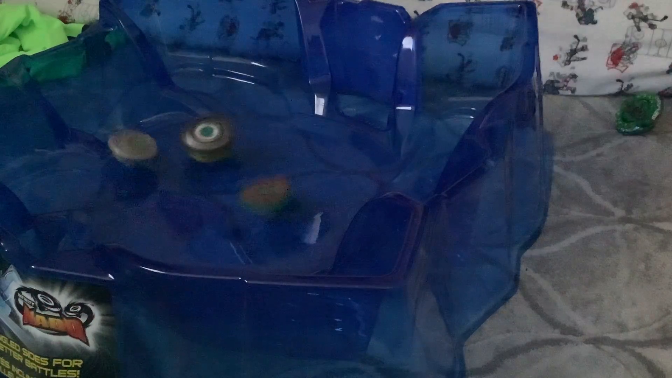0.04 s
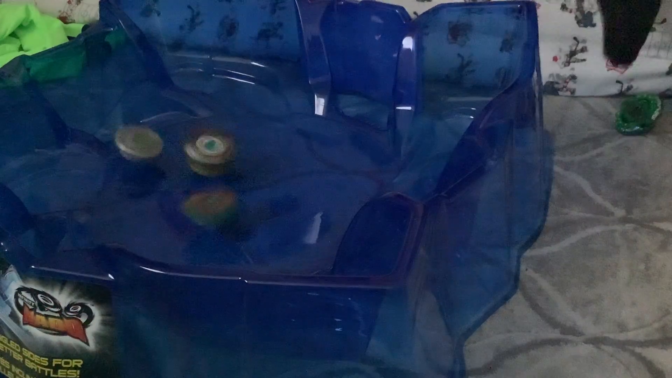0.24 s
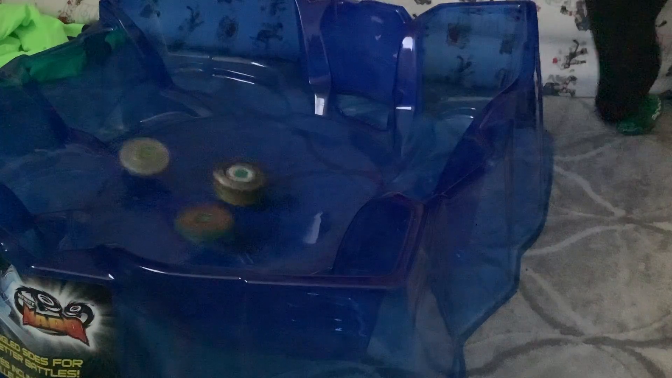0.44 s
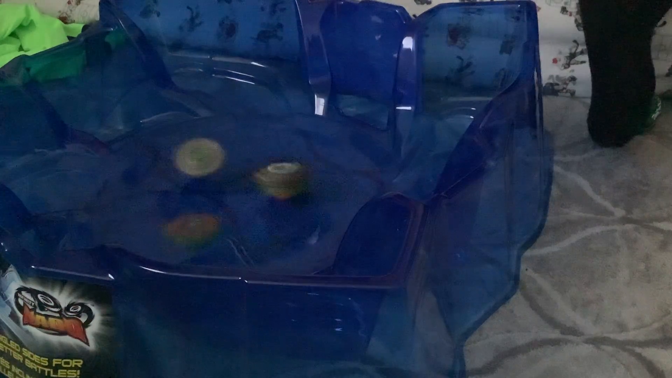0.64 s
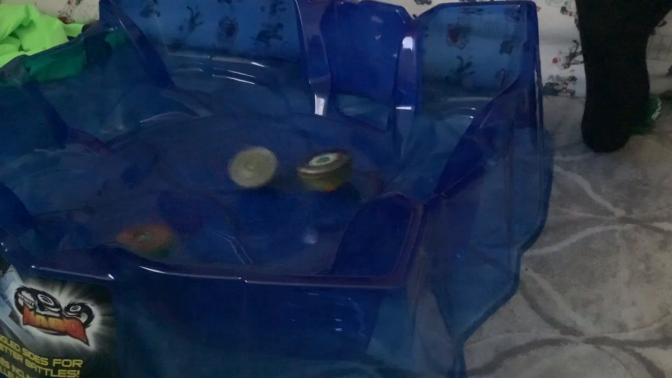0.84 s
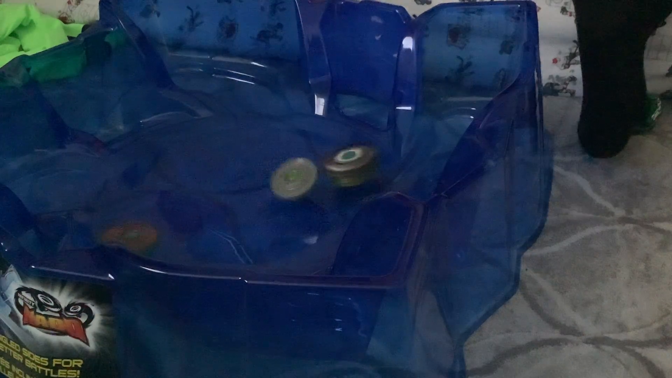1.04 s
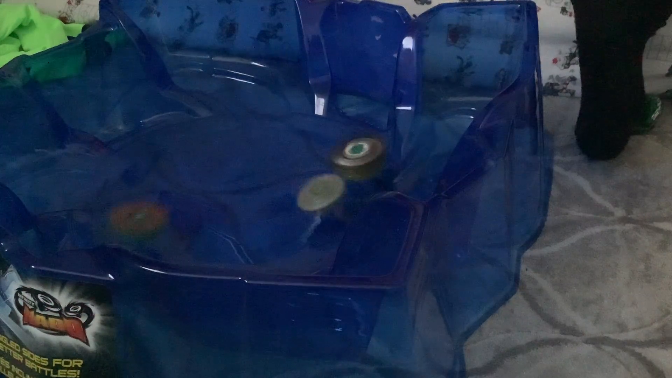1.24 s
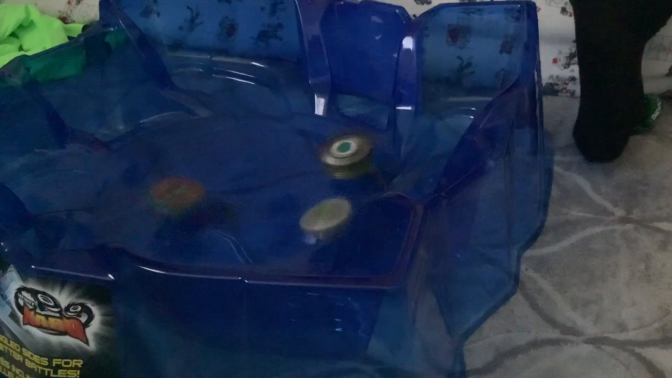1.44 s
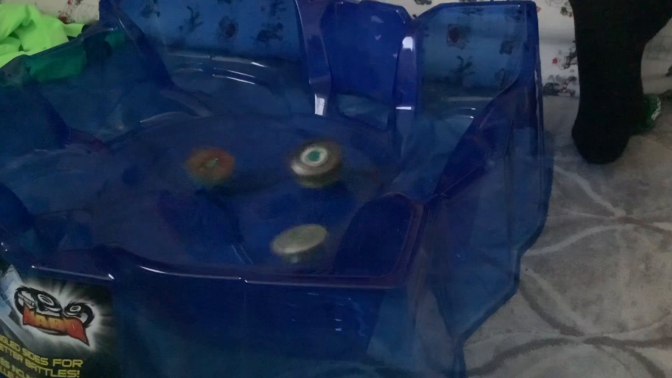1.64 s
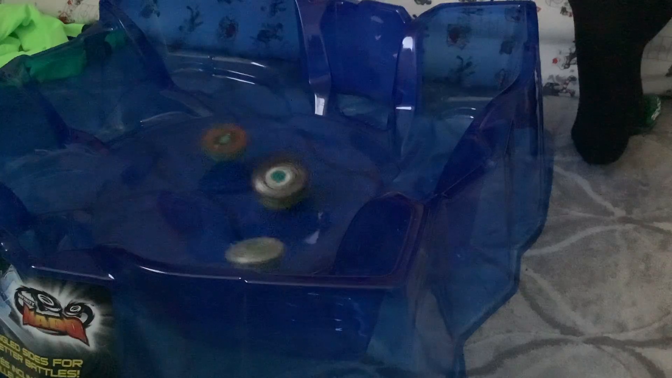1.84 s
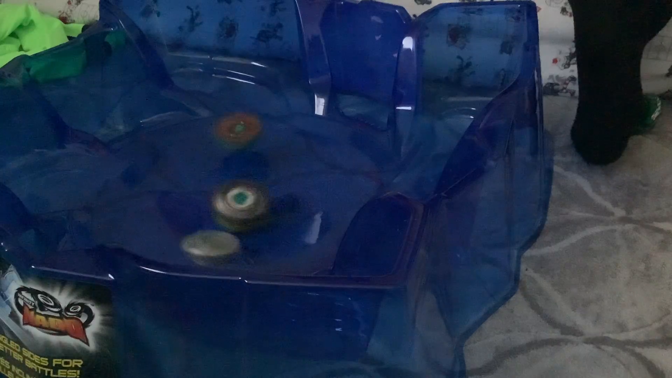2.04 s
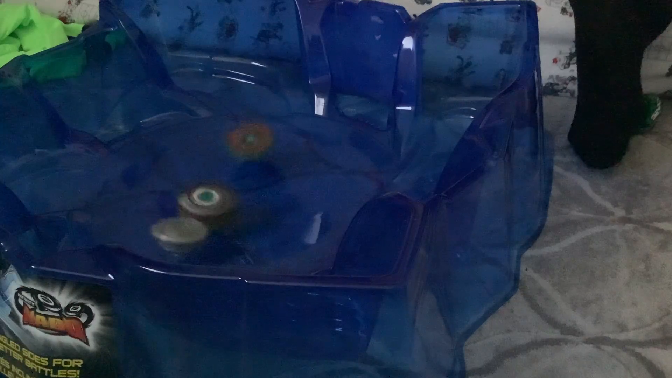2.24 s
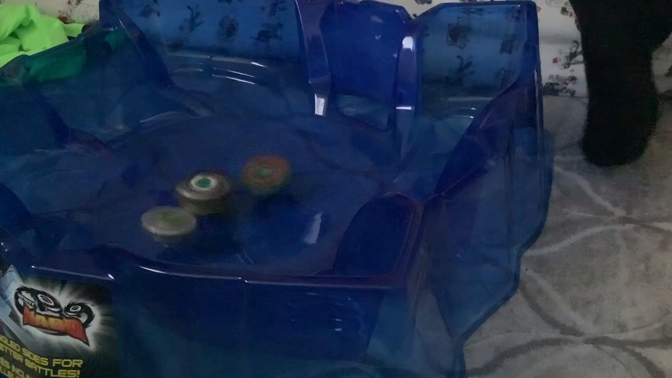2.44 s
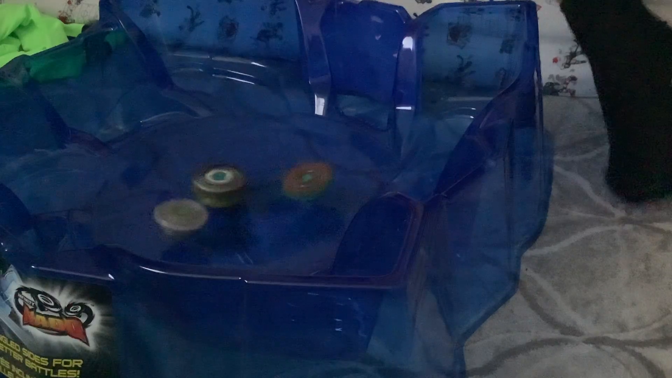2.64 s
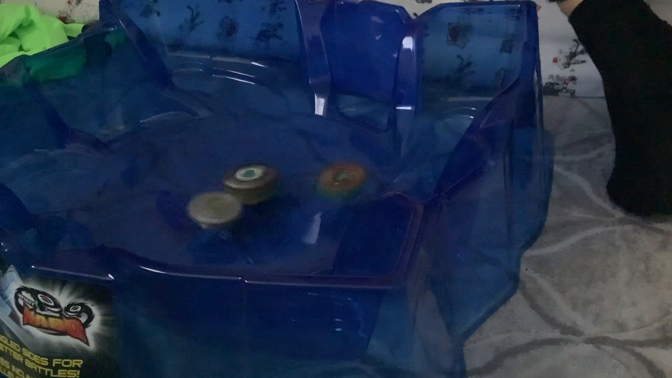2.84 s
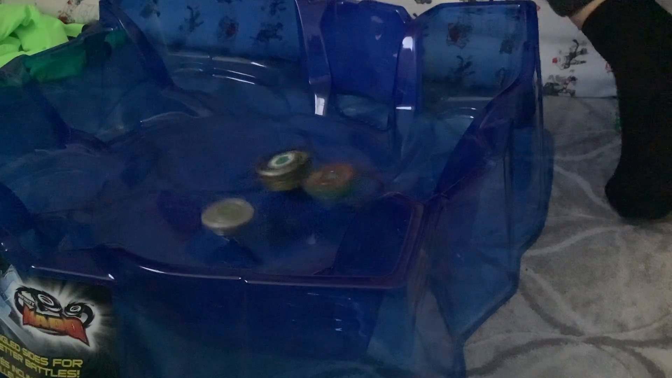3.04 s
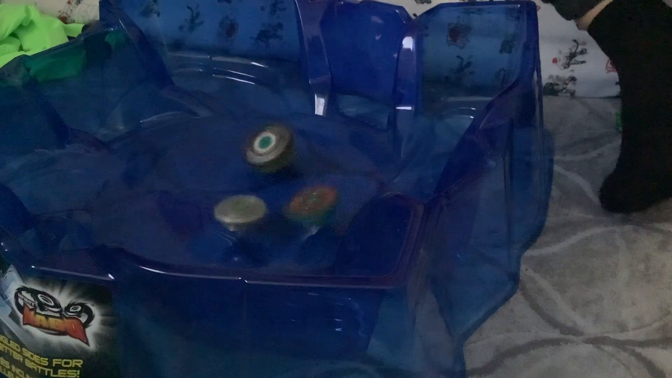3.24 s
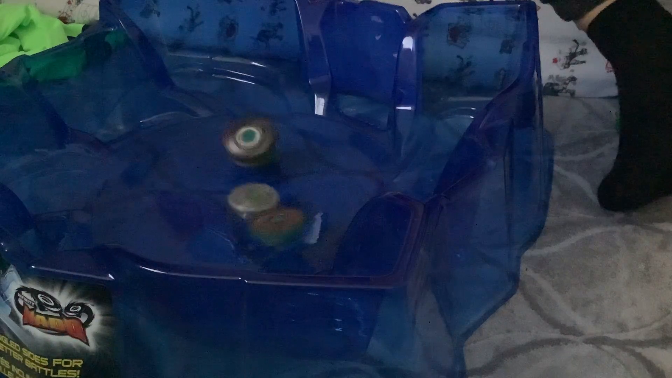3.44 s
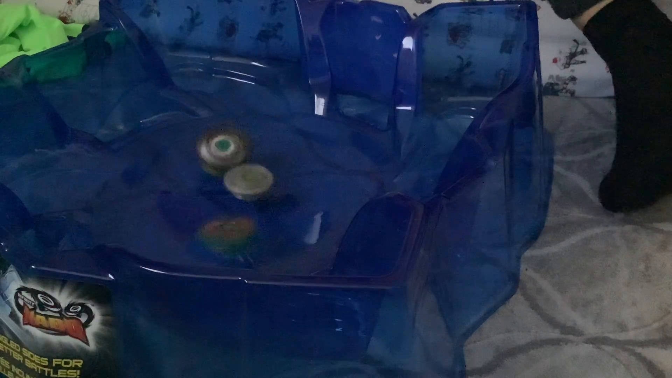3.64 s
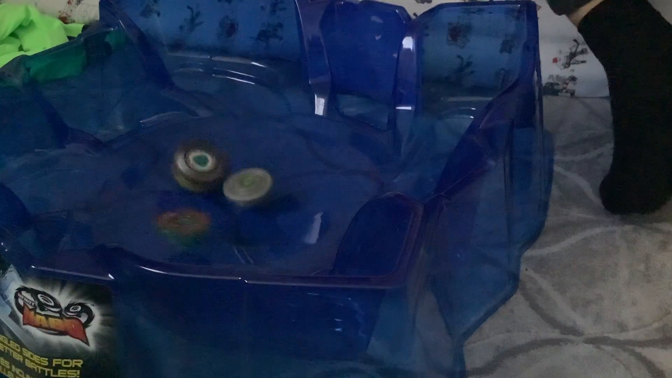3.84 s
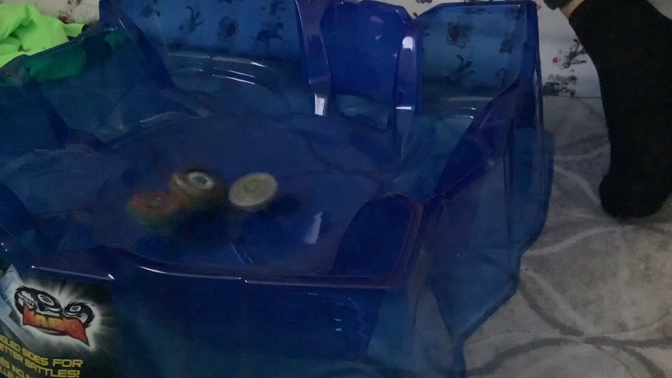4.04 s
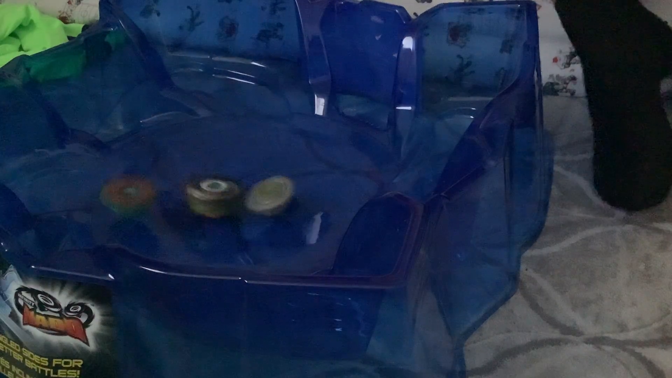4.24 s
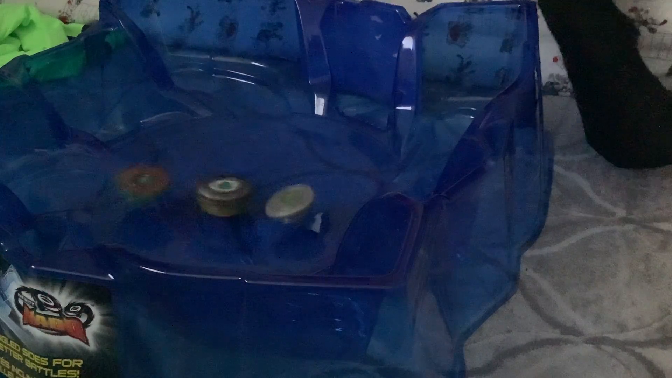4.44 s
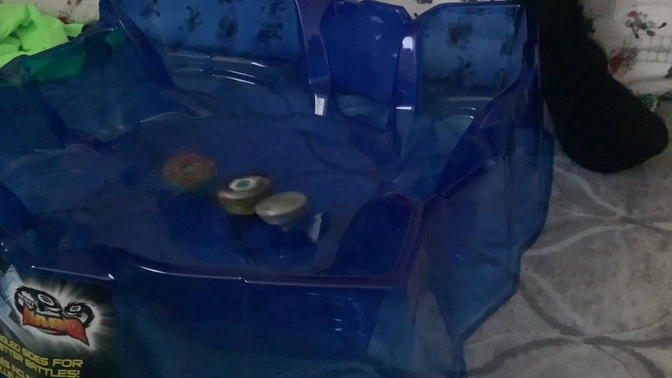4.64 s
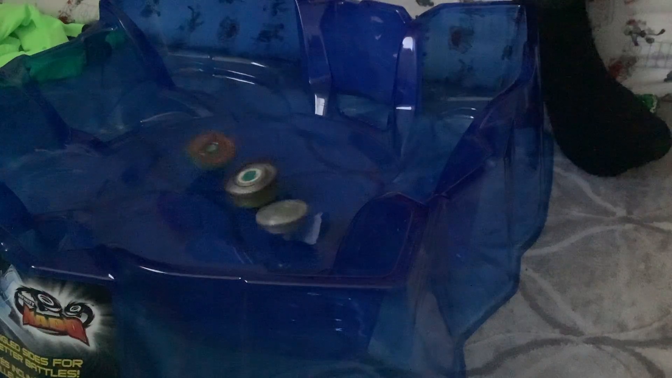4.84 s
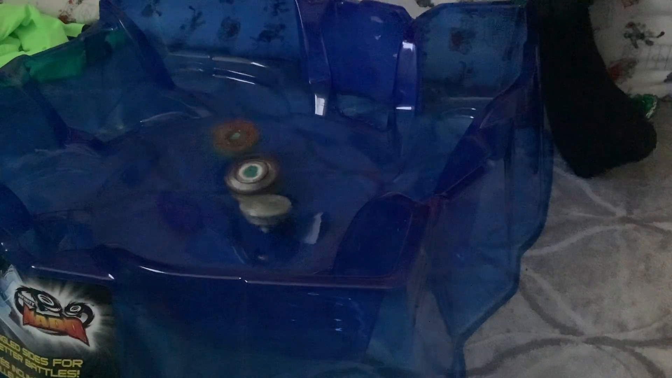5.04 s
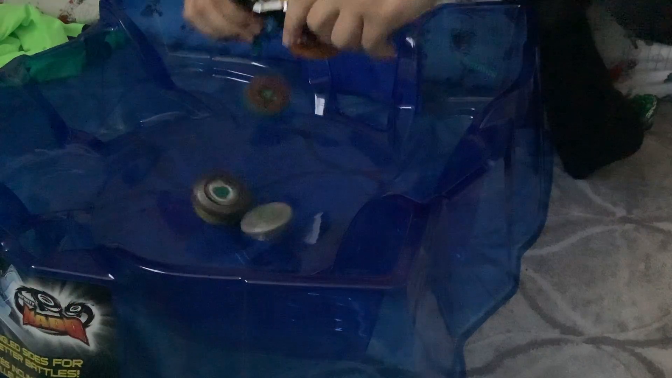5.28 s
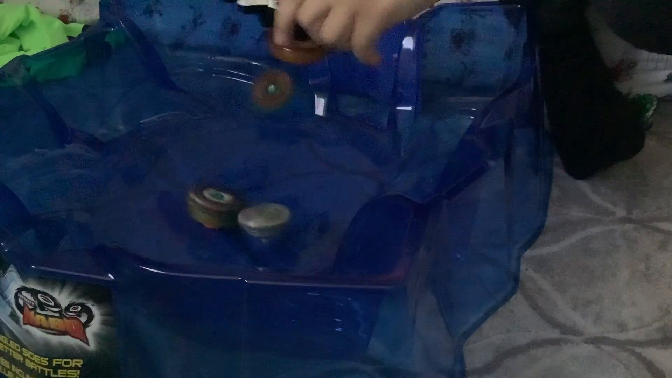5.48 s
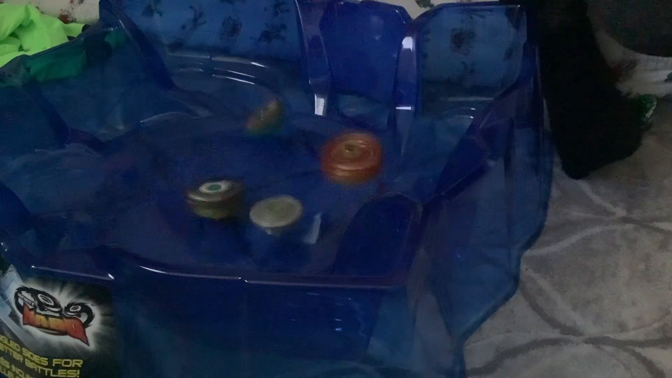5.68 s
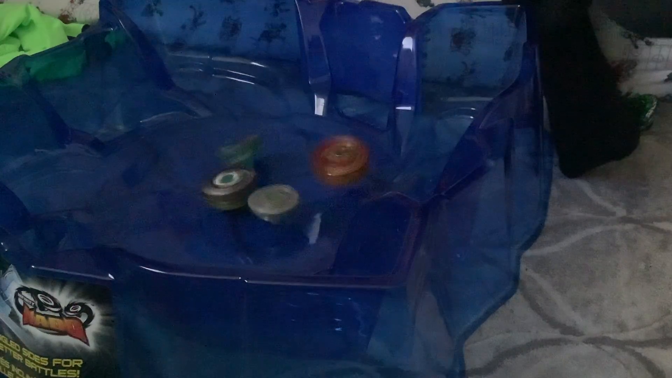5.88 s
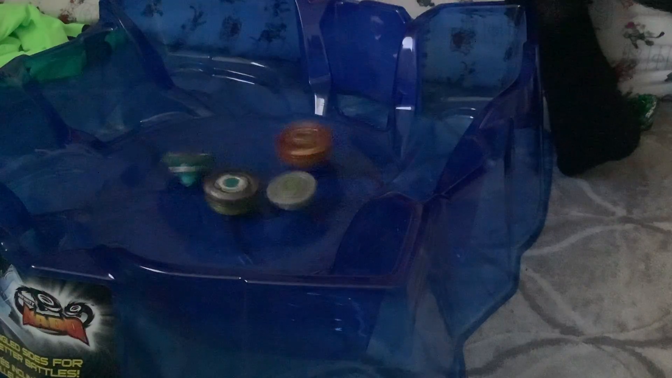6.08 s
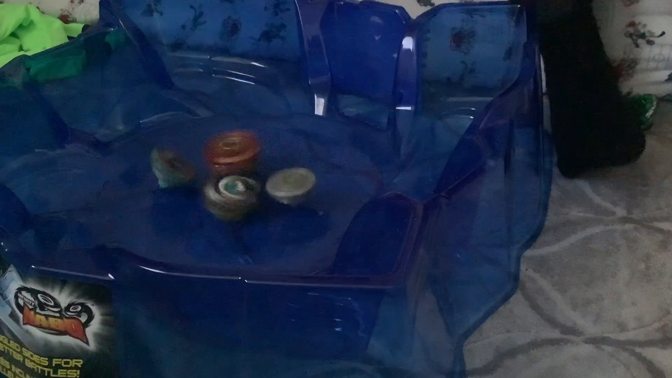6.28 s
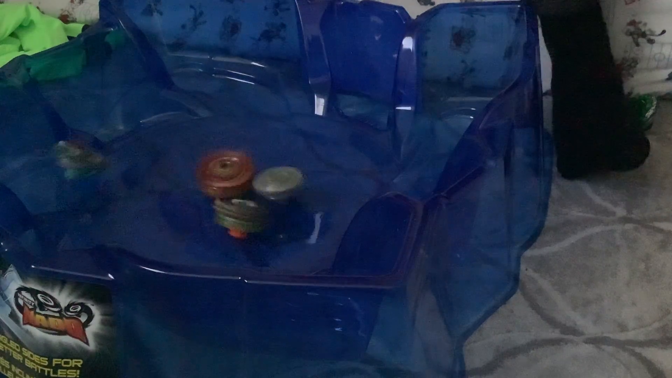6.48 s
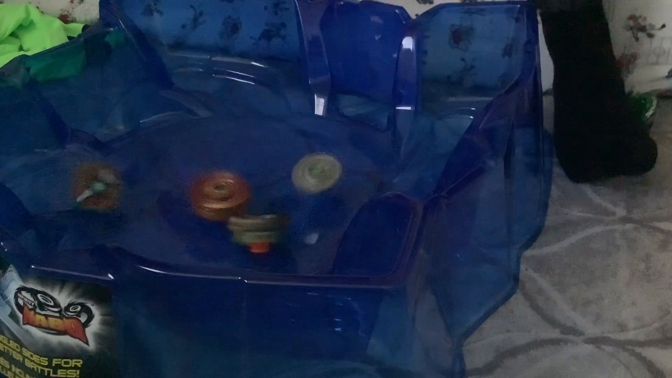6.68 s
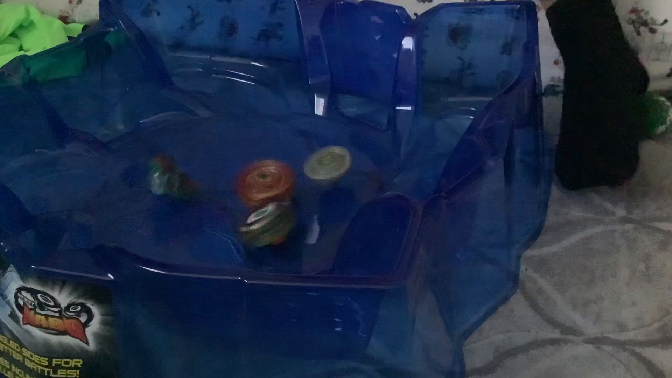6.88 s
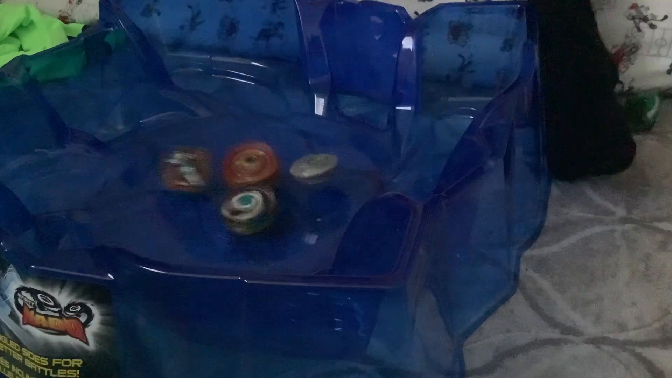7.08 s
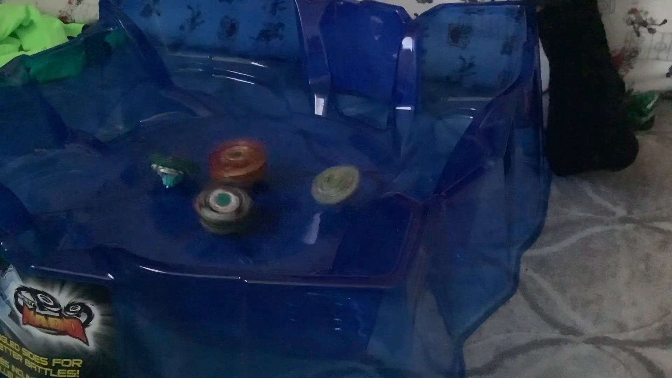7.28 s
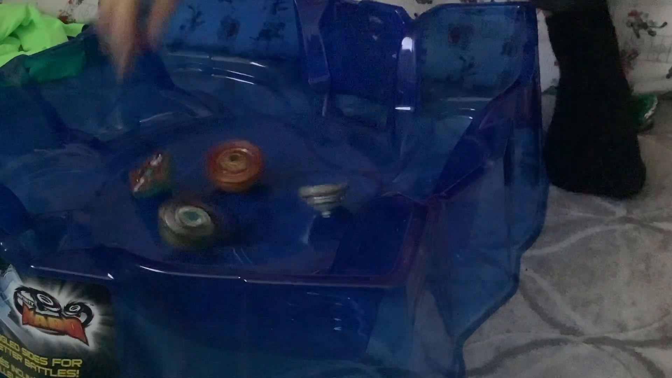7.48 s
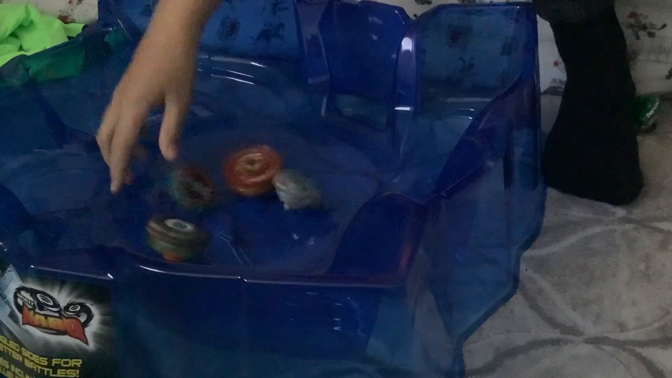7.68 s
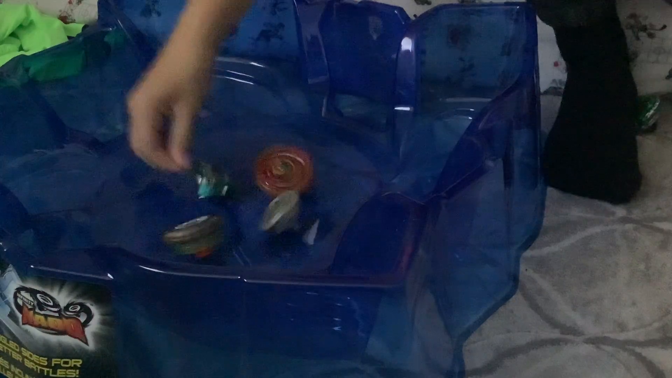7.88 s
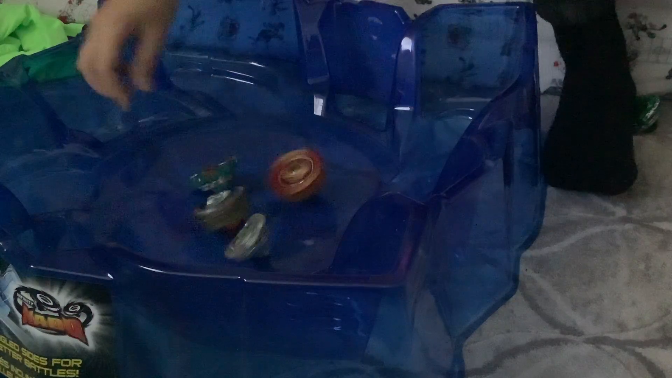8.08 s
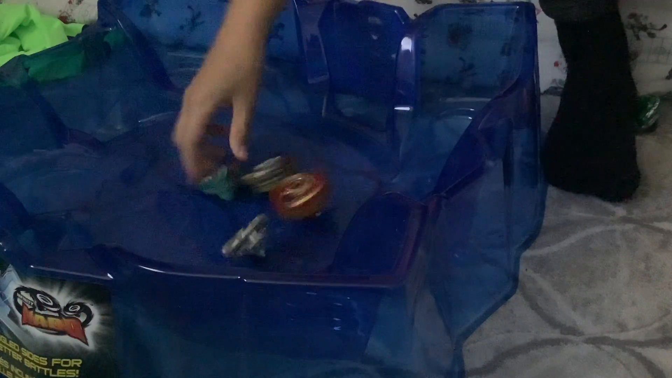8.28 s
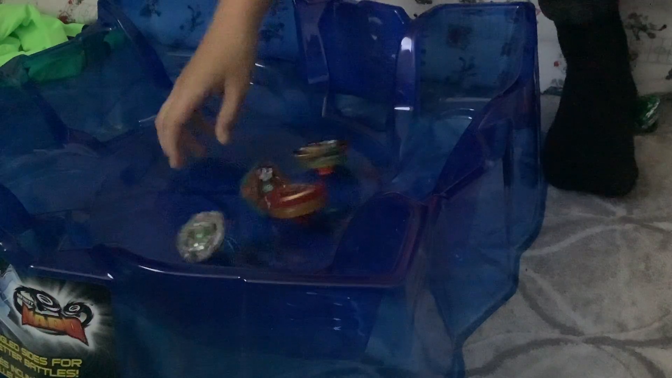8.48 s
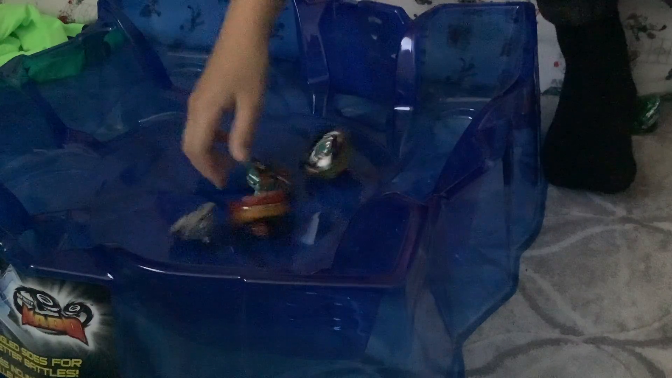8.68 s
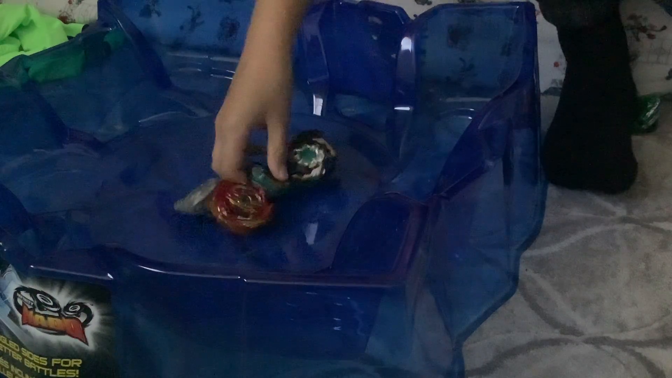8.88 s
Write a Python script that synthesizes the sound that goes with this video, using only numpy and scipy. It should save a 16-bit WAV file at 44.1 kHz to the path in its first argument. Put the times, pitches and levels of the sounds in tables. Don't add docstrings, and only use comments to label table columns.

```python
import sys
import numpy as np
from scipy import signal
from scipy.fft import rfft, irfft, next_fast_len
from scipy.io import wavfile

SR = 44100
rng = np.random.default_rng(int(sys.argv[2]) if len(sys.argv) > 2 else 0)


def ratio_of_db(decibels):
    return 10 ** (np.asarray(decibels, float) / 20)


def wrap_up_sound(samples):
    columns = np.atleast_2d(samples).T
    tamed = np.clip(columns, -1, 1)
    steps = np.round(tamed * 32767).astype(np.int16)
    wavfile.write(sys.argv[1], SR, steps)


N = 393372

# (frequency [Hz], level [dB], decay t60 [s])
RING_MODES = [(6720, -16, .4), (7773, -7, .2), (7815, -8, .24), (12570, -2, .17), (14660, 0, .17)]
# (frequency [Hz], level [dB], decay t60 [s])
BOWL_MODES = [(236, -4.5, 0.12), (282.7, 0, 0.11), (326, -9.5, 0.11), (393.4, 2, 0.099), (457.5, -2, 0.087),
              (493, 1, 0.036), (549.4, -1.5, 0.034), (589.6, -2.5, 0.039)]
# (frequency [Hz], level [dB], decay t60 [s])
FLEX_MODES = [(79.2, -0.5, 0.12), (94.9, 5.5, 0.12), (117, 9, 0.032), (153.9, -6.5, 0.23),
              (192, -9.5, 0.18)]
# (frequency [Hz], level [dB], decay t60 [s])
SHELL_MODES = [(1541, -0.5, 0.017), (1927, 3, 0.005), (2064, -4, 0.043), (2306, 9.5, 0.004),
               (2737, 2, 0.015), (2910, -2, 0.031), (3020, 3, 0.0078), (3275, -10, 0.022),
               (3520, 3, 0.0043)]
# (frequency [Hz], level [dB], decay t60 [s])
KNOCK_MODES = [(719, -10, 0.055), (794, -7, 0.059), (833, -2.5, 0.03), (1012, -3, 0.027),
               (1164, -1.5, 0.021), (1470, -7.5, 0.015)]
# (frequency [Hz], gain [dB])
BRIGHT_COLOUR = [(1820, -51), (3100, 2), (3470, -12.5), (4100, -6.5), (4490, -6.5), (6270, -3.5),
                 (8060, -5.5), (9390, -4), (10800, -13.5), (11800, -13.5), (14000, -14.5), (16100, -24),
                 (16400, -58)]
# (frequency [Hz], decay t60 [s])
ROOM_DECAY = [(100, 0.38), (400, 0.21), (1800, 0.34), (5000, 0.22), (13000, 0.2)]
# (delay [s], level [dB], smear [s])
ROOM_ECHOES = [(.0012, 0, .0009), (.004, 1, .0013), (.018, -2.3, .0024), (.036, -12, .006)]

# (time [s], wobble weight [dB], skid speed [dB], nearness to the soft middle [dB])
ROLL_PATH = [(0.0, -48.5, -60.5, 9), (0.3, -39, -53, -2.5), (0.65, -48, -54, 7), (0.87, -51, -63.5, 4.5),
             (1.41, -49.5, -64.5, 0), (1.84, -55, -66.5, 3), (2.2, -46, -64, -0.5), (2.66, -59.5, -66, 5.5),
             (3.05, -49.5, -58.5, 3), (3.6, -47.5, -59.5, -1.5), (4.5, -56, -68, 2), (5.5, -49.5, -62, 1),
             (6.15, -32, -56, -5.5), (6.41, -46, -74, -6), (6.85, -44.5, -53, 5), (7.3, -48, -67, -15),
             (7.78, -41.5, -59, 3), (8.92, -41.5, -53.5, 0.5)]
# (middle time [s], level [dB], length [s])
RIM_RUBS = [(1.067, -64, 0.054), (2.374, -48.5, 0.21), (5.61, -43, .08), (5.93, -45, 0.36),
            (6.047, -41, 0.15), (6.534, -52, 0.066), (7.483, -46, 0.14), (7.887, -37.5, 0.14),
            (8.29, -40, 0.094), (8.364, -52, 0.17)]
# (time [s], metal level [dB], shell level [dB], bowl level [dB])
EARLY_CLASHES = [(0.269, -24.5, -38.5, -36), (0.2852, -26, -39.5, -28.5), (0.6408, -21, -31, -32.5),
                 (0.6586, -41, -65, -37), (0.768, -43.5, -48, -37), (1.037, -40, -46.5, -37.5),
                 (1.0704, -40.5, -51, -46), (2.174, -39, -43, -70), (2.184, -32.5, -42, -71),
                 (2.249, -30.5, -42, -39), (2.2777, -26, -40.5, -41), (2.4775, -26.5, -35.5, -30.5),
                 (2.509, -26.5, -37, -35), (2.843, -27.5, -40.5, -38), (2.9853, -25.5, -34, -32.5),
                 (3.1677, -25.5, -36.5, -33), (3.4065, -39, -48, -54), (3.7437, -24, -37.5, -37),
                 (4.0155, -26.5, -40, -35), (4.116, -35, -50, -40.5), (4.1306, -25, -36, -31),
                 (4.2318, -27.5, -40, -36), (4.3215, -36, -40.5, -33), (4.3289, -27.5, -36.5, -33),
                 (4.7101, -34.5, -43.5, -35.5), (4.7668, -27, -34.5, -31), (4.774, -27.5, -42, -30),
                 (5.171, -25.5, -36.5, -28), (5.2055, -20, -37.5, -39), (5.242, -23, -35.5, -28)]
# (time [s], metal level [dB], shell level [dB], bowl level [dB])
LATE_CLASHES = [(5.6953, -20.5, -25.5, -18), (5.8719, -24.5, -30.5, -22), (5.9893, -27, -36, -26),
                (6.002, -24, -41, -46), (6.3585, -25.5, -40, -37.5), (6.3871, -16.5, -30, -21),
                (6.4909, -28, -35, -22), (6.5235, -25.5, -39, -25), (6.562, -22.5, -35.5, -30),
                (6.6774, -25, -35, -28), (7.1008, -26.5, -38, -29), (7.1201, -25.5, -34, -31),
                (7.152, -26.5, -38, -32), (7.226, -28, -41, -32), (7.2436, -25, -38.5, -30.5),
                (7.3952, -28.5, -45, -30), (7.446, -24, -32.5, -31.5), (7.7604, -26, -41, -29),
                (7.8283, -22.5, -39, -22.5), (7.9386, -27, -39, -27), (8.1686, -40, -45, -49),
                (8.1876, -25, -40.5, -28), (8.263, -33, -40, -49), (8.2996, -26, -36, -30.5),
                (8.367, -32.5, -41.5, -34), (8.448, -26.5, -38, -28), (8.55, -32, -45, -38),
                (8.6181, -37, -47, -47), (8.732, -39, -45, -28), (8.7998, -33, -43, -31)]
# (time [s], metal level [dB])
RIM_TICKS = [(0.061, -52), (0.248, -51), (0.4101, -57), (0.4286, -43.5), (0.5792, -62), (.748, -43),
             (1.014, -49), (1.1607, -48), (1.3134, -58), (1.3833, -52), (1.4516, -50), (1.499, -59),
             (1.5156, -51.5), (1.583, -53), (1.8703, -49.5), (2.052, -54), (2.37, -36.5), (2.59, -41),
             (2.612, -39), (3.4823, -48), (3.5016, -46), (3.6243, -55), (3.6533, -52), (3.677, -45.5),
             (3.892, -52), (4.499, -57.5), (5.1003, -67), (8.877, -43.5)]
# (time [s], bowl level [dB])
BOWL_BUMPS = [(0.1352, -37.5), (6.1165, -34), (6.1723, -36.5), (6.1896, -34), (6.2255, -36.5),
              (6.2637, -39.5), (6.8038, -34.5), (7.6434, -36), (7.6654, -35), (7.678, -37), (7.7092, -33),
              (7.7402, -29.5), (8.0156, -34)]
# (time [s], metal level [dB])
CORD_CATCHES = [
    (5.4293, -33),
    (5.453, -34.5),
    (5.4732, -32),
    (5.4874, -27),
    (5.5114, -20),
]
# (time [s], level [dB], frequency [Hz], decay t60 [s])
SQUARE_BLOWS = [(3.222, -35, 390, .1), (.24, -36.5, 194, .1), (1.068, -39, 2000, .02),
                (1.072, -32.5, 240, 0.11), (3.746, -31, 440, 0.067), (4.333, -28, 426, .07),
                (5.7, -18, 159, 0.12), (5.701, -24, 725, .06), (7.45, -29.5, 394, 0.08),
                (8.25, -28.5, 370, 0.066), (2.25, -32, 1070, 0.025), (2.279, -35, 685, .04),
                (2.612, -40, 4300, .012), (2.843, -34.5, 955, .03), (2.987, -36, 5000, 0.0091),
                (3.406, -41, 4530, 0.0091), (3.675, -37, 4300, 0.0086), (3.8907, -47.5, 4200, 0.016),
                (4.2318, -49, 880, 0.056), (4.3281, -31, 993, 0.068), (4.7103, -37.5, 1050, 0.027),
                (5.697, -30.5, 1090, 0.077), (5.874, -44, 1270, .025), (5.874, -33, 2070, 0.015),
                (6.389, -27, 810, .03), (6.493, -31, 1490, .025), (6.562, -26, 890, 0.017),
                (8.187, -33, 5600, 0.011), (8.8, -56, 940, .05)]
# (time [s], frequency [Hz], level [dB])
STEADY_HUM = [
    (1.5, 90.3, -54.5),
    (1.964, 89.6, -63),
    (2.1, 90, -59),
]
# (time [s], frequency [Hz], level [dB])
LEANING_HUM = [
    (3.5, 150.4, -62),
    (3.68, 165, -58),
    (3.85, 170, -62),
]
# (time [s], peak level [dB])
SINGING_BLOWS = [
    (2.4788, -46),
    (4.3286, -32),
    (4.7681, -37),
    (6.5615, -27),
    (6.6812, -34),
    (7.2265, -38),
    (8.4472, -41),
]
# (time [s], rasp level [dB], body level re rasp [dB])
CORD_PULL = [
    (5.485, -38, -18),
    (5.505, -33, -7),
    (5.53, -26.5, -12),
    (5.555, -21.5, -8.5),
    (5.585, -29, -8.5),
    (5.62, -46.5, 13),
]


def rms_one(x):
    return x / np.sqrt(np.mean(x ** 2) + 1e-20)


def in_time(rows):
    s, *columns = np.transpose(rows)
    return [np.interp(np.arange(N) / SR, s, c) for c in columns]


def at_hz(points, hz):
    table = np.array(points)
    return np.interp(np.log(hz + 1), np.log(table[:, 0]), table[:, 1])


def bandfilter(x, order, hz, kind):
    return signal.sosfilt(signal.butter(order, hz, kind, fs=SR, output="sos"), x)


def train(s, heights):
    out = np.full(N, 1e-18)
    np.add.at(out, np.minimum((s * SR).astype(int), N - 1), heights)
    return out


def ring(drive, hz, t60):
    radius, w = ratio_of_db(-60 / (t60 * SR)), 2 * np.pi * hz / SR
    return signal.lfilter([0, np.sin(w)], [1, -2 * radius * np.cos(w), radius * radius], drive)


def strike(modes, s, db, spread_db, rolling=0):
    luck = rng.standard_normal((len(s), len(modes)))
    out = 0
    for k, (hz, level_db, t60) in enumerate(modes):
        drive = train(s, ratio_of_db(db + spread_db * luck[:, k])) + rolling
        out = out + (-1) ** k * ring(ratio_of_db(level_db) * drive, hz, t60)
    return out


def grains(per_s, uneven_db):
    sizes = ratio_of_db(uneven_db * np.minimum(rng.exponential(1, N), 5)) * rng.choice([-1, 1], N)
    return rms_one(sizes * (rng.random(N) < per_s / SR))


def shake(modes, drive):
    none = np.zeros(0)
    return rms_one(strike(modes, none, none, 0, drive))


def brighten(x):
    size = next_fast_len(N)
    gain = ratio_of_db(at_hz(BRIGHT_COLOUR, np.fft.rfftfreq(size, 1 / SR)))
    high = bandfilter(x, 4, 3200, "high")
    return irfft(rfft(high, size) * gain, size)[:N]


def rolling():
    weight_db, skid_db, middle_db = in_time(ROLL_PATH)
    t = np.arange(N) / SR
    rub = sum(ratio_of_db(db - 20 * np.abs(t - s) / length) for s, db, length in RIM_RUBS)
    wobble_db, speed_db = weight_db + 48, skid_db + 60

    def stutter(modes, per_s):
        return shake(modes, grains(3 * per_s, 3.2))

    shell = stutter(KNOCK_MODES, 900) + ratio_of_db(-0.5) * stutter(SHELL_MODES, 900)
    grit = rms_one(brighten(grains(5000, 3.5)))
    buzz = ratio_of_db(-54 + 0.46 * (wobble_db + speed_db)) + rub
    flex = ratio_of_db(-57.5 + 0.6 * wobble_db + middle_db + 5.5) * stutter(FLEX_MODES, 300)
    middle = ratio_of_db(weight_db + middle_db - 6.5) * stutter(BOWL_MODES[:3], 400)
    wall = ratio_of_db(weight_db - 0.5) * stutter(BOWL_MODES[3:], 400)
    return flex + middle + wall + buzz * ratio_of_db(-3.5) * shell + (ratio_of_db(skid_db) + rub) * ratio_of_db(-6.5) * grit


def contacts():
    ticks = [(s, db, db - 9, db - 14.5) for s, db in RIM_TICKS]
    bumps = [(s, db - 9, db - 11.5, db) for s, db in BOWL_BUMPS]
    catches = [(s, db, db - 11.5, db - 30) for s, db in CORD_CATCHES]
    return sorted(EARLY_CLASHES + LATE_CLASHES + ticks + bumps + catches)


def chatter(s, db):
    tick = train(s, ratio_of_db(db))
    rattle = signal.lfilter([0, 1], [1, -.975], tick) * rng.choice([-1, 1], N)
    return tick + .055 * rattle


def clashes(rows):
    s, crack_db, clack_db, thump_db = np.transpose(rows)
    air_db = -33.5 + 1.11 * (crack_db + 24.5)
    knock_db = -2.5 + clack_db + 0.44 * (thump_db - clack_db)
    edge = bandfilter(chatter(s, crack_db + 33.0), 2, 6560, "low")
    air = bandfilter(chatter(s, air_db + 46.0), 2, 8920, "high")
    crack = brighten(edge + air)
    clack = strike(SHELL_MODES, s, clack_db + 5.0, 3.7)
    clack = clack + bandfilter(chatter(s, clack_db + 20.5), 2, [1300, 3400], "band")
    knock = strike(KNOCK_MODES, s + 0.0012, knock_db + 5.5, 3.7)
    thump = signal.lfilter([.25], [1, -.75], strike(BOWL_MODES, s + 0.002897, thump_db + 1.5, 3.15))
    return crack + clack + knock + thump


def pings():
    out, t = np.zeros(N + SR), np.arange(SR // 4) / SR
    for s, db, hz, t60 in SQUARE_BLOWS:
        cluster = sum(np.sin(2 * np.pi * hz * (1 + .07 * k) * t) for k in (-1.3, 0, 1))
        out[int(s * SR):][:len(t)] += ratio_of_db(db - 60 * t / t60) * cluster
    return out[:N]


def thuds():
    s, *_, bowl_db = np.transpose(EARLY_CLASHES + LATE_CLASHES)
    return strike(FLEX_MODES, s, -41 + 1.5 * (bowl_db + 31.5), 0.58)


def whirl(rows):
    hz, db = in_time(rows)
    t = np.arange(N) / SR
    fade = np.clip(np.minimum(t - rows[0][0], rows[-1][0] - t) / 0.15, 0, 1)
    return fade * ratio_of_db(db + 6.5) * np.sin(2 * np.pi * np.cumsum(hz) / SR)


def singing():
    return strike(RING_MODES, *np.transpose(SINGING_BLOWS), 2.3)


def launcher():
    rasp_db, body_db = in_time(CORD_PULL)
    t = np.arange(N) / SR
    on = (t > CORD_PULL[0][0]) & (t < CORD_PULL[-1][0])
    teeth = grains(4500, 3.6)
    body = shake(KNOCK_MODES[4:] + SHELL_MODES, teeth)
    top_band = signal.cheby2(5, 40, [0.89 * 11200, 16000], "band", fs=SR, output="sos")
    whine = rms_one(signal.sosfilt(top_band, teeth))
    rasp = rms_one(brighten(teeth))
    return on * ratio_of_db(rasp_db) * (rasp + ratio_of_db(-3) * whine + ratio_of_db(body_db) * body)


def room_response(direct_db, tail_db):
    t = np.arange(SR // 2) / SR
    early = sum(ratio_of_db(db) * np.exp(-.5 * ((t - s) / smear) ** 2) for s, db, smear in ROOM_ECHOES)
    out = bandfilter(early * rng.standard_normal(len(t)), 1, 600, "high")
    out[0] += ratio_of_db(direct_db)
    swell = 1 - np.exp(-t / .011)
    edges = 50 * 2.0 ** np.arange(0, 8.6, 1)
    for low, high in zip(edges, np.minimum(edges * 2, .45 * SR)):
        band = bandfilter(rng.standard_normal(len(t)), 2, [low, high], "band")
        fall = ratio_of_db(tail_db - 60 * t / at_hz(ROOM_DECAY, 1.93 * low))
        out += fall * swell * min(1, low / 300) * band
    return out / np.sqrt(np.sum(out ** 2))


def scene():
    paths = [room_response(9, -3) for k in range(3)]
    spots = [clashes(contacts()[k::3]) for k in range(3)]
    cord = launcher()
    spots[0] = spots[0] + pings()
    spots[1] = spots[1] + ratio_of_db(-2.5) * cord + ratio_of_db(8.5) * thuds()
    in_room = sum(signal.fftconvolve(x, path)[:N] for x, path in zip(spots, paths))
    close = ratio_of_db(-4.0) * rolling() + ratio_of_db(-6.0) * singing() + ratio_of_db(-4.5) * cord
    hums = whirl(STEADY_HUM) + whirl(LEANING_HUM)
    hush = ratio_of_db(-75) * signal.lfilter([1], [1, -.6], rng.standard_normal(N))
    return (in_room + close + hums + hush)[None]


def band_limit(x):
    return signal.sosfilt(signal.butter(12, 16970, fs=SR, output="sos"), x)


def record(dry):
    x = bandfilter(dry, 5, 64, "high")
    mix = signal.sosfilt(signal.cheby2(10, 50, 16900, fs=SR, output="sos"), x)
    return band_limit(mix)


dry = scene()
out = record(dry)
wrap_up_sound(out)
```